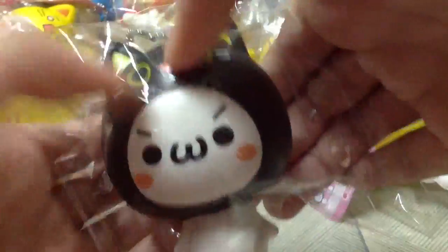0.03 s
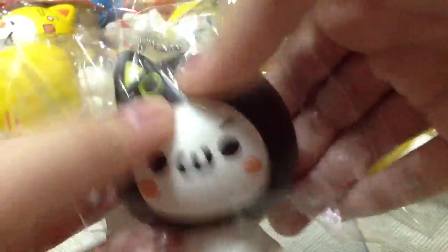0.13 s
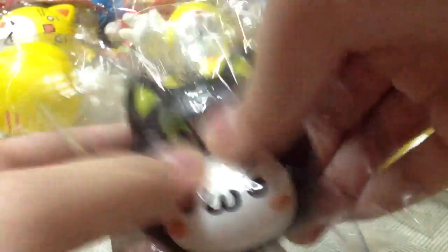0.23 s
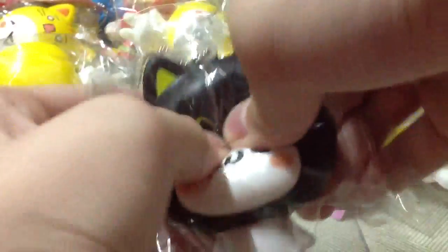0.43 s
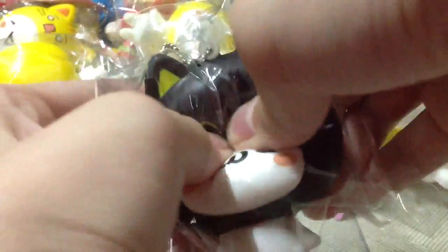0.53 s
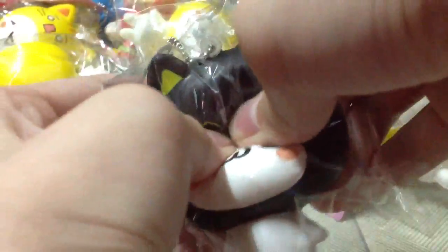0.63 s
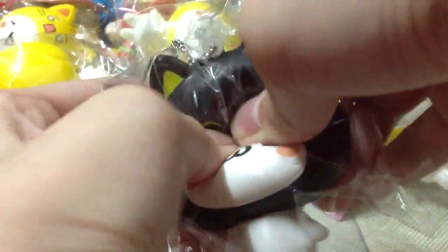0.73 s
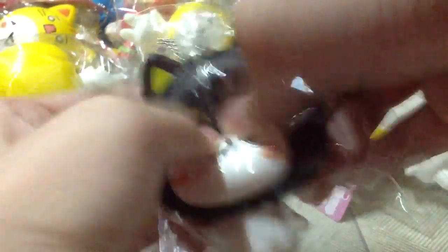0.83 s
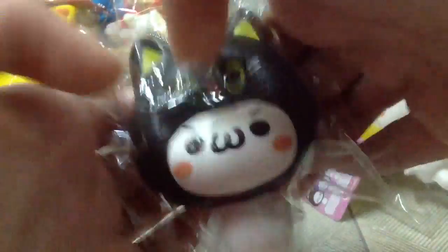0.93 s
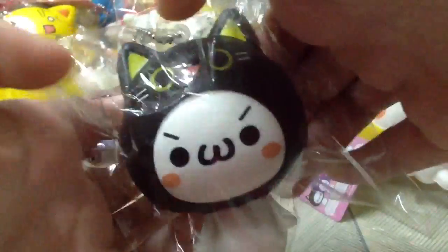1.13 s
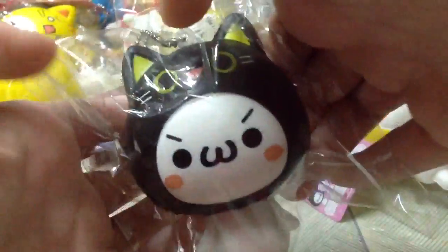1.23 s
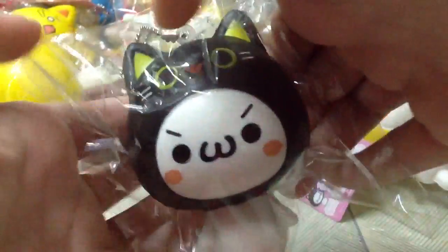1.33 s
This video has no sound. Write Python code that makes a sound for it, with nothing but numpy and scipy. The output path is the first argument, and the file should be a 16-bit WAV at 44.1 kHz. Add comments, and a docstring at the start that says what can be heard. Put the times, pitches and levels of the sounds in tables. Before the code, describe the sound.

Thin plastic crinkles close by in a small room as fingers squeeze a bagged soft toy. Irregular sharp snaps and fine crackle build from 0.2 seconds, then thin out between 0.5 and 0.8 while the grip rests. Around 0.9 the release brings the loudest, dense rush of crackling with dull rubbing and faint pops. The plastic settles with a few light ticks until about 1.4 seconds.

```python
"""Squeezing a soft toy in a plastic bag

Fingers squeeze a toy sealed in thin plastic film, close by in a small room. Creases snap one by
one over a fine crackle and a duller rubbing. The grip rests, then lets go in a dense rush, and the
toy bumps the palm. Slack panels of the bag pop dully, and the film settles with a few last ticks."""
import sys
import numpy as np
from scipy import signal
from scipy.fft import rfft, irfft
from scipy.io import wavfile
from scipy.ndimage import uniform_filter1d, minimum_filter1d

SR = 44100
rng = np.random.default_rng(int(sys.argv[2]) if len(sys.argv) > 2 else 0)


def int16_out(signal):
    """Quantize to a 16-bit WAV file."""
    q = np.round(np.clip(np.atleast_2d(signal).T, -1, 1) * 32767)
    wavfile.write(sys.argv[1], SR, q.astype(np.int16))


N = 61739

# Tone colour of the room's background: f/Hz, level/dB
AIR_SPECTRUM = [(25, -10), (60, -6), (110, 0.5), (200, 13), (350, 10), (700, -1), (1300, -22), (4000, -11),
                (10000, -22), (15000, -31), (16000, -40)]
# Time the room's echo takes to fade by 60 dB: f/Hz, t/s
ROOM_FADE_TIMES = [(150, 0.65), (1000, 0.37), (5000, 0.12), (10000, 0.15), (16000, 0.17)]
# Dull tone colour of film pressed on the toy: f/Hz, level/dB
TOY_SPECTRUM = [(40, -44), (100, -10.5), (200, 0), (380, -7), (550, 6), (850, -2), (1300, -9), (2100, -3),
                (4000, -19), (12000, -29)]
# How strongly the fingers rub: t/s, level/dB
RUB_LEVELS = [(0, -49.5), (.1, -50), (.21, -43), (.3, -50), (.385, -47.5), (.48, -60), (.6, -65),
              (.78, -56), (.86, -54), (.89, -28.5), (.94, -37.5), (.97, -48), (1, -48), (1.03, -68),
              (1.15, -54.5), (1.26, -52), (1.4, -63.5)]
# Pops of slack film: t/s, level/dB, middle of the pitch slide f/Hz
PANEL_POPS = [(0.128, -29.5, 620), (0.156, -32.5, 690), (0.18, -34, 624), (0.204, -29, 626),
              (0.257, -27.5, 676), (0.339, -29.5, 860), (0.72, -31, 564), (0.88, -22.5, 925),
              (0.887, -25, 573), (0.938, -20, 558), (0.991, -23.5, 448), (1.085, -27.5, 910),
              (1.168, -32.5, 467), (1.196, -28, 298), (1.235, -31.5, 460), (1.257, -30, 580),
              (1.272, -36, 620), (1.297, -34.5, 630), (1.354, -31.5, 497)]
# Tone colour of the fine crackle: f/Hz, level/dB
CRACKLE_SPECTRUM = [(100, -34), (500, -44), (1200, -8), (2800, -5), (4000, -3.5), (5200, -5), (7000, -4),
                    (10500, -5.5), (12500, -7.5), (14800, -5), (16000, -33)]
# How strongly the sliding film crackles: t/s, level/dB
CRACKLE_LEVELS = [(0, -56), (.02, -57.5), (.11, -46), (.18, -51.5), (.21, -40.5), (.255, -40), (.285, -43),
                  (.3, -32), (.312, -54), (.323, -37.5), (.345, -33), (.36, -41.5), (.385, -40.5),
                  (.42, -49.5), (.455, -41), (.478, -70), (.50, -56), (.555, -41.5), (.575, -55),
                  (.62, -55), (.70, -50), (.765, -58), (.777, -47), (.805, -50), (.855, -41), (.878, -25.5),
                  (.912, -22.5), (.945, -26), (.965, -31.5), (.985, -41), (.998, -29.5), (1.01, -45.5),
                  (1.055, -60), (1.072, -57), (1.12, -57.5), (1.185, -61.5), (1.215, -54), (1.28, -60),
                  (1.4, -65.5)]
# Tone colour that all the snaps start from: f/Hz, level/dB
SNAP_SPECTRUM = [(40, -23), (110, -29), (220, -15), (400, -10.5), (650, -6.5), (1200, -2.5), (2600, -0.5),
                 (4500, 2.5), (8000, 0), (11000, -2), (14800, -4.5), (16000, -38.5)]
# Snapping creases: t/s, level/dB, ring f/Hz, then four relative levels:
# ring/dB, body (the lows)/dB, edge (the highs)/dB, scuff (small slips after the snap)/dB
CREASE_SNAPS = [(0.0087, -13, 4100, 15, -8, 4.5, -11), (0.0184, -24, 3800, 2, -1, -4, 3.5),
                (0.0295, -11, 3900, 6, -15, -5, -18), (0.0414, -15, 11300, 7, -9, -5, -27),
                (0.05, -12.5, 6550, 16, -6, -1, -9), (0.0723, -8, 10600, -1, -25, -2, -5),
                (0.0763, -17, 6500, 5, 0.5, 1, 3), (0.084, -23.5, 2800, 17, -20, -8, 3),
                (0.1086, -15.5, 12500, 2.5, -2.5, -2.5, -6), (0.1344, -15.5, 5100, 4, -2, -9, -4),
                (0.1667, -16.5, 3700, 5, -18, -13, -9), (0.1816, -21.5, 3700, 12, -1, -22, -1),
                (0.19, -5, 6060, 16, -31, -2, -27), (0.2027, -7.5, 4740, -1, -7, -7, -7),
                (0.209, -5, 5160, 3.5, -11, -8, -15), (0.2172, -2.5, 11400, 11, 2, -1, -10),
                (0.2279, 6, 4600, 11.5, -7, 5, -7.5), (0.233, -4.5, 7540, 0, -7, -1, -12),
                (0.2425, -14, 9600, 11, -39, -5, -3), (0.2597, -12, 4170, 7, -3, -2, 3.5),
                (0.2633, -7.5, 3100, -7, 0, -16, -9), (0.2702, -5.5, 8600, 2, -13, -7, -1.5),
                (0.2762, -13.5, 9400, 3, 0, -5, -4), (0.2882, -19, 5000, 6, -18, -13, -9),
                (0.2978, -11.5, 8500, 11, 3, 2, 2.5), (0.3071, -10, 7500, 18, -32, -14, -15),
                (0.3156, -12, 10300, -2, -22, 2, -9), (0.3211, -11, 7800, 6, -11, -2, -8),
                (0.3326, -11.5, 7900, 2, -12, -2, 3), (0.3412, -1, 5700, 17, -16, -9, -21),
                (0.3662, -18, 6160, 8, 7, -20, -6), (0.3703, -5, 4400, 10, -7, -13, -10),
                (0.378, -16, 5000, 9, 1, -5, 4), (0.3835, 0, 5000, 6.5, -1, -4.5, -4),
                (0.3864, -6.5, 5160, 24, -11, -17, -5), (0.391, -3.5, 5250, 1, -10, -9, -4),
                (0.4045, -17, 5450, 4, -8, -7, -12), (0.4065, -8, 9500, 6, -9, -13, -8),
                (0.4299, -12.5, 6000, 8, -0.5, -3, 2.5), (0.4448, -9.5, 4300, 14, -15, -4, -9),
                (0.446, -10, 4570, 13, -16, -4, -16), (0.4476, -1.5, 5000, -0.5, -19, -5.5, -14),
                (0.4523, -11.5, 4600, 10, -5, -9, 0), (0.4642, -12, 4500, 10, 3.5, -11, -6),
                (0.4874, -14, 8200, 4, -4, 7, -15), (0.4905, -6.5, 6950, 3, -10.5, -11, -11),
                (0.5006, -16.5, 3700, 12, -4, -15, -6), (0.5033, -18.5, 3700, 15, 0, -16, -6),
                (0.516, -6, 9700, -7.5, -12.5, -2, -28), (0.5203, -14, 6870, 1, -14, -10, -5),
                (0.5272, -9.5, 12900, 2, -13, -9, -14), (0.5277, -14, 5000, 0, -12, -6, -16),
                (0.5362, -18, 11000, 2, -3, -10, -8), (0.5381, -15, 12000, 7, -19, -2, -2),
                (0.54, -6.5, 13800, 3.5, -12, -5.5, -8), (0.5532, -10, 9900, -7, -11, 1, -32),
                (0.5924, -13.5, 8100, 10, -10, -15.5, -9), (0.63, -13.5, 10600, -14, -18, 7, -22),
                (0.6433, -8.5, 3500, 9, -4, -7, -17), (0.6447, 3.5, 4660, 11.5, -8, -8.5, -14.5),
                (0.6465, -9, 2970, 5.5, -2.5, -6.5, -7), (0.6688, -20, 3720, 9, 0, -12, -18),
                (0.6903, -1, 4900, 4.5, -34, -3, -18), (0.7211, -19.5, 1080, 7, 2, -14, -12),
                (0.7737, -18.5, 9240, 14, -13, -12, 1), (0.779, -16.5, 6550, 6, -15, -4, -3),
                (0.7836, -17, 4050, 20, -27, -21, -8), (0.7924, -18, 1440, 1, 8, -7, -6),
                (0.8177, -12.5, 4400, 14, -5, -3, -4), (0.8201, -15.5, 5300, 0, 3.5, -3, -3),
                (0.8291, -10.5, 5060, 7, -4, -3, -7), (0.847, -10, 6700, 3, -16, -3, 1.5),
                (0.8573, -8, 11400, -4, -12, -2, -13), (0.8649, 4, 12100, 8, -6, -0.5, -18),
                (0.8684, -4, 13500, 5, -9, -3, -14), (0.8704, 0.5, 9900, 3, -10.5, -9, -10),
                (0.8756, -3, 9800, 13, -18, -3, -17), (0.8837, 0.5, 4970, 1, -6.5, -7, -8),
                (0.8887, -0.5, 3800, 5, 1, 2, -18), (0.898, 4, 10700, 5, -20, -5, -3.5),
                (0.9094, -4, 4700, 8, -30, -8, -7), (0.9135, 2, 7950, 5, -14, 4, -17),
                (0.9151, 4, 14000, 2, -9.5, -3, -14), (0.918, 3, 5170, 7, -9, 2.5, -5),
                (0.9321, 1, 3780, 8, -25, -4, -3), (0.941, 7, 6000, -2.5, -22, -10.5, -12),
                (0.9709, -3.5, 8750, 14, -15, -6, -9), (0.9739, -5.5, 5800, 5, -14, -7, -0.5),
                (0.9919, -7, 4200, 3, -5.5, -4, -3), (0.9948, -7, 4560, 20, -11, -1, 4.5),
                (0.9993, -6.5, 10400, 23.5, -3.5, -20, 3), (1.038, -15.5, 4800, 5, -6, -5, -3.5),
                (1.0675, -22, 9300, 8, -14, -10, 5), (1.0765, -7.5, 7250, 5.5, -8.5, -11, -5),
                (1.088, -10, 3100, 6, -10, -8.5, -11), (1.104, -12.5, 7650, 3, -11.5, -12, -28),
                (1.1321, -8, 10100, 13, -21, -4, -36), (1.1403, -10, 7340, 5.5, -2, -16, -4.5),
                (1.1997, -8, 4080, 6.5, -3, -1.5, -12), (1.211, -13.5, 9450, 10, -12, -7, -9),
                (1.221, -23, 7900, 11, -13, -6, -12), (1.2382, -7, 4200, 5, -10, -4, -6),
                (1.2586, -21, 4200, 5, 2, -5, -6), (1.2992, -22, 4320, 22, -5, -3, -1),
                (1.3085, -15, 4600, -5, -22, -16, -3), (1.3572, -16, 9600, 9, -2.5, -13, 1),
                (1.3625, -15, 3100, 8.5, -10, -7, 0.5)]

TAPS, TOP_HZ = 2048, 15500  # samples used to build one click; top of the treble
FLUTTER_DB = -2  # the quick shiver after a click, compared with the click


def amp(db):
    """Turns decibels into a number to multiply by."""
    return 10 ** (np.asarray(db) / 20)


def unit(x):
    """Scales a sound to a total energy of 1."""
    return x / np.sqrt(np.sum(x ** 2) + 1e-20)


def evened(x):
    """Scales a sound to an average power of 1."""
    return unit(x) * np.sqrt(len(x))


def read(points, hz):
    """Looks up a table by frequency, blending between its rows."""
    f, value = np.transpose(points)
    return np.interp(np.log(hz + 1), np.log(f + 1), value)


def level(points):
    """Turns a table of levels over time into a gain for every sample."""
    return amp(np.interp(np.arange(N) / SR, *np.transpose(points)))


def add(mix, start_s, sound):
    """Adds a sound to the mix at the given time."""
    part = mix[max(round(start_s * SR), 0):][:len(sound)]
    part += sound[:len(part)]


def air():
    """The steady, low noise of the room."""
    colour = amp(read(AIR_SPECTRUM, np.fft.rfftfreq(N, 1 / SR)))
    return amp(-60) * evened(irfft(rfft(rng.standard_normal(N)) * colour, N))


def room(x):
    """Sound bounces quickly off hands and table, then leaves a faint echo in the room."""
    t = np.arange(SR // 2) / SR
    near_noise, tail_noise, chance = rng.standard_normal((3, len(t)))
    near = unit(near_noise * (chance > 1) * (t > .0015) * np.exp(-t / .0068))
    hz, frame_s, bands = signal.stft(tail_noise, SR, nperseg=256)
    fade = amp(-60 * frame_s / read(ROOM_FADE_TIMES, hz)[:, None])
    tail = signal.istft(bands * fade, SR, nperseg=256)[1][:len(t)]
    return signal.fftconvolve(x, amp(-21.5) * near + amp(-18.5) * unit(tail * (t > .005)))[:N]


def click(colour_db):
    """The sharpest click that can have this tone colour."""
    log_gain = np.log(amp(np.r_[colour_db, colour_db[-2:0:-1]]))
    return irfft(np.exp(np.conj(signal.hilbert(log_gain)))[:len(colour_db)])


def ring(hz, ring_hz, hump_db, hump_octaves=.48, peak_db=4, peak_width_hz=330):
    """How one small flat patch of film rings, in dB: a narrow peak on a broad hump."""
    peak = peak_db / (1 + ((hz - ring_hz) / peak_width_hz) ** 2)
    return peak + hump_db / (1 + (np.log2((hz + 1) / ring_hz) / hump_octaves) ** 4)


def crease(colour_db, flutter_db=FLUTTER_DB, flutter_s=.0006, linger_s=.002):
    """One crease clicks and shivers briefly; bending waves in the film carry the treble out first."""
    t, hz = np.arange(TAPS) / SR, np.fft.rfftfreq(TAPS, 1 / SR)
    flutter = amp(flutter_db) * unit(rng.standard_normal(TAPS) * np.exp(-t / flutter_s))
    linger = amp(-14) * unit(rng.standard_normal(TAPS) * np.exp(-t / linger_s))
    spectrum = rfft((t == 0) + flutter + linger)
    spectrum /= np.sqrt(uniform_filter1d(abs(spectrum) ** 2, size=70))  # even out broad bumps
    delay_s = .0003 * np.maximum(1 - hz / TOP_HZ, 0)
    spectrum *= np.exp(-2j * np.pi * np.cumsum(delay_s) * hz[1])
    return unit(irfft(spectrum * rfft(click(colour_db)))[:TAPS // 2])


def tiny_slips(spectrum, per_s, spread_db, low_hz, high_hz, ring_db, patches=24):
    """A shower of tiny slips, shared among patches of film that ring at different pitches."""
    hz = np.fft.rfftfreq(TAPS, 1 / SR)
    size = amp(spread_db * np.minimum(rng.exponential(1, N), 3))
    kicks = (rng.random(N) < per_s / SR) * rng.choice([-1, 1], N) * size
    kicks /= np.sqrt(abs(uniform_filter1d(kicks ** 2, size=330)) + 1e-2)  # steady the loudness
    patch, out = rng.integers(0, patches, N), np.zeros(N)
    for k, ring_hz in enumerate(np.geomspace(low_hz, high_hz, patches)):
        tick = crease(read(spectrum, hz) + ring(hz, ring_hz, ring_db))
        out += signal.oaconvolve(kicks * (patch == k), tick)[:N]
    return evened(out)


def bump(start_s=.993, hz=140, decay_s=.008):
    """The toy springs back against the palm."""
    t = np.maximum(np.arange(N) / SR - start_s, 0)
    return amp(-47) * np.sin(2 * np.pi * hz * t) * np.exp(-t / decay_s)


def rub():
    """The film slips with a dull sound where the fingers press it onto the toy."""
    slips = tiny_slips(TOY_SPECTRUM, per_s=1400, spread_db=5, low_hz=398, high_hz=2320, ring_db=10)
    return amp(-4.5) * level(RUB_LEVELS) * slips


def pops(rise_s=.00042, decay_s=.0017, sag=.17, delay_s=.001926):
    """Slack panels flip over with a dull tick and a very short tone that falls in pitch."""
    out, t = np.zeros(N), np.arange(TAPS) / SR
    tick = unit(click(read(TOY_SPECTRUM, np.fft.rfftfreq(TAPS, 1 / SR))))
    rise, fade = 1 - np.exp(-t / rise_s), np.exp(-t / decay_s)
    for start_s, db, middle_hz in PANEL_POPS:
        pitch_hz = middle_hz * (1 + sag * (2 * fade - 1))
        panel = np.sin(2 * np.pi * np.cumsum(pitch_hz) / SR) * rise * fade
        add(out, start_s + delay_s, amp(db - .5) * (panel + amp(9.5) * tick))
    return out


def crackle(peak_per_s=4200):
    """Countless small creases give way while the film moves; they thin out as it slows."""
    motion = level(CRACKLE_LEVELS)
    per_s = peak_per_s * (motion / motion.max()) ** .25
    return motion * tiny_slips(CRACKLE_SPECTRUM, per_s, spread_db=4, low_hz=3160, high_hz=14000, ring_db=6)


def ripple(hz, spread_db=1.8):
    """Chance bumps and dips in the tone colour of one crease, in dB."""
    points_hz = np.geomspace(400, TOP_HZ, 20)
    return spread_db * np.interp(hz, points_hz, rng.standard_normal(len(points_hz)))


def snaps(body_hz=3100, edge_hz=7440, scuff_s=.0013):
    """Each crease flips with its own tone colour, and smaller slips scuff after it."""
    out, hz = np.zeros(N), np.fft.rfftfreq(TAPS, 1 / SR)
    t = np.arange(TAPS // 2) / SR
    lows = 1 / (1 + (hz / body_hz) ** 8)
    highs = 1 - 1 / (1 + (hz / edge_hz) ** 8)
    for start_s, db, ring_hz, ring_db, body_db, edge_db, scuff_db in CREASE_SNAPS:
        colour = read(SNAP_SPECTRUM, hz) + ripple(hz) + lows * (body_db + 8.5) + highs * (edge_db + 9)
        ringing = ring(hz, ring_hz, ring_db)
        snap = crease(colour + ringing, FLUTTER_DB - .45 * db)  # harder snaps are crisper
        add(out, start_s, amp(db - .5) * snap)
        slips = rng.standard_normal(len(t)) ** 3 * t * np.exp(-t / scuff_s)  # swell, then die away
        scuff = unit(signal.fftconvolve(slips, click(colour + ringing / 2)))
        add(out, start_s, amp(db + scuff_db - .5) * scuff)
    return out


def scene():
    """The bag and the toy, with the room's echo and background."""
    bass_cut = signal.butter(3, 153, "high", fs=SR, output="sos")  # thin film gives off little bass
    film = signal.sosfilt(bass_cut, snaps() + crackle() + rub() + pops())
    bag = film + bump()
    return (bag + room(bag) + air())[None]


def cut_treble(x, taps):
    """Removes the very highest treble; more taps make the cut steeper."""
    return signal.oaconvolve(x, signal.firwin(taps, TOP_HZ, window=("kaiser", 8), fs=SR)[None], "same")


def record(dry, ceiling=.68):
    """Trims the treble and turns the level down for a moment at the sharpest peaks."""
    x = cut_treble(dry, taps=201)
    needed_gain = ceiling / np.maximum(abs(x), ceiling)
    smooth_gain = uniform_filter1d(minimum_filter1d(needed_gain, size=41), size=41)
    return cut_treble(x * smooth_gain, taps=401)


dry = scene()
out = record(dry)
int16_out(out)
```